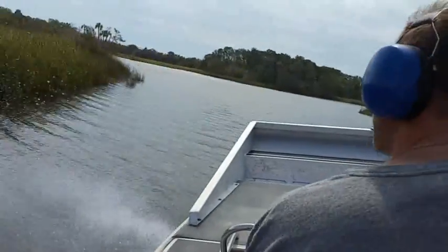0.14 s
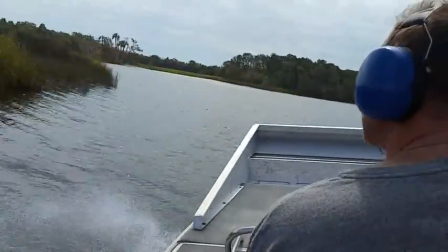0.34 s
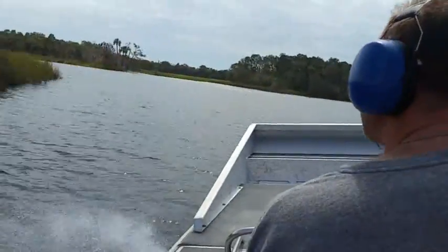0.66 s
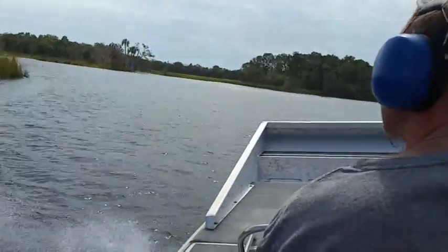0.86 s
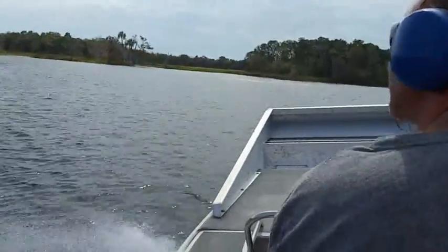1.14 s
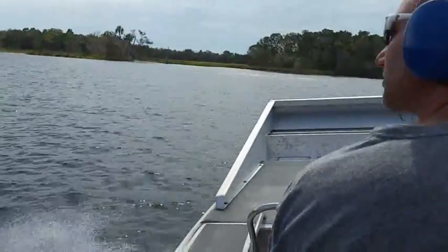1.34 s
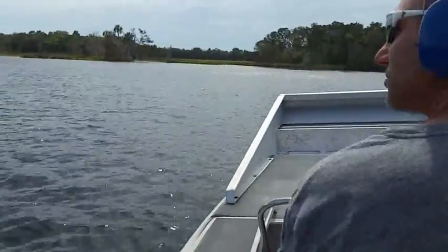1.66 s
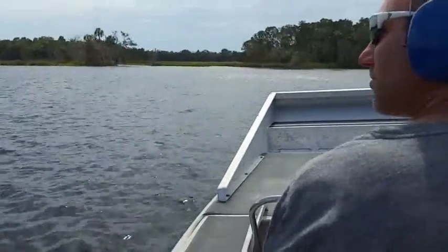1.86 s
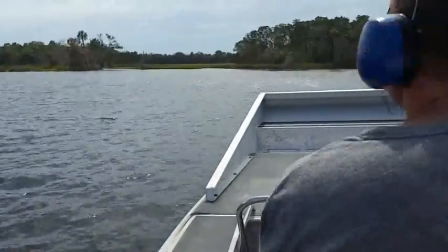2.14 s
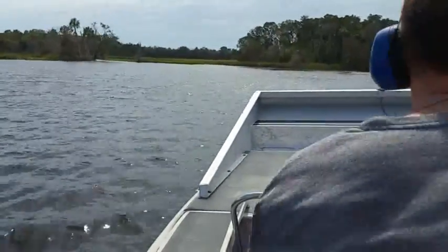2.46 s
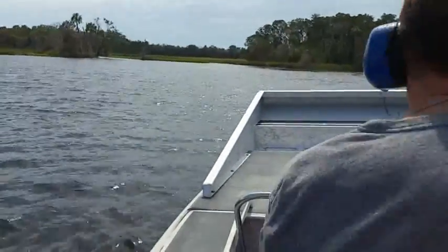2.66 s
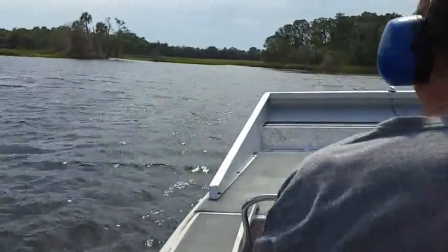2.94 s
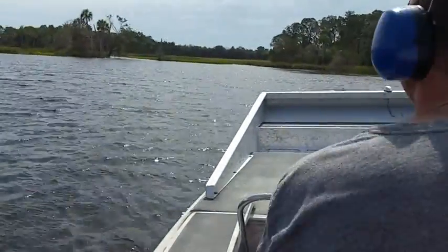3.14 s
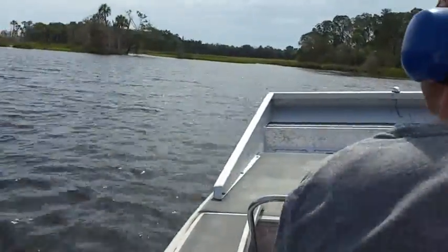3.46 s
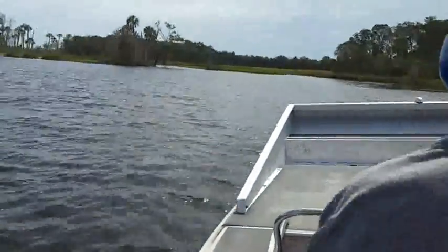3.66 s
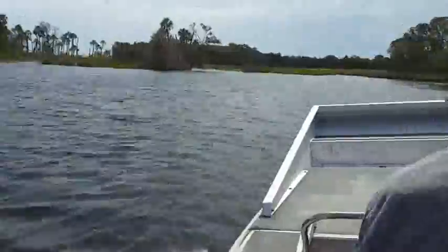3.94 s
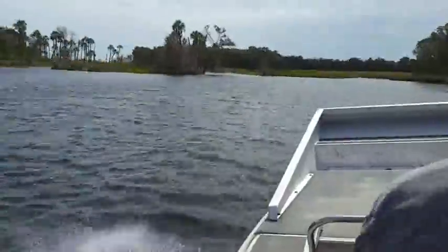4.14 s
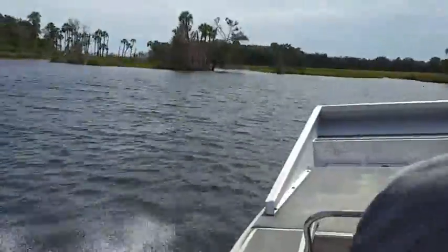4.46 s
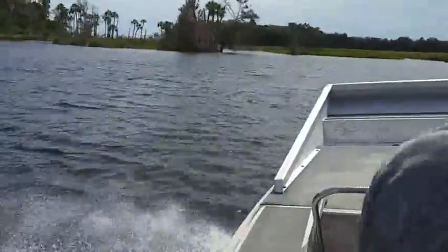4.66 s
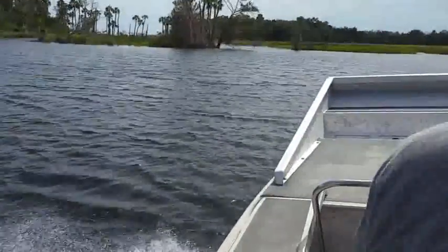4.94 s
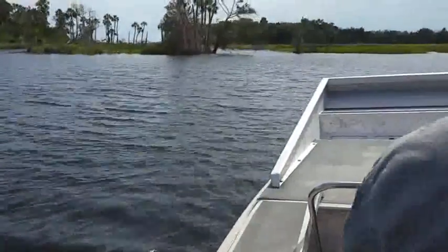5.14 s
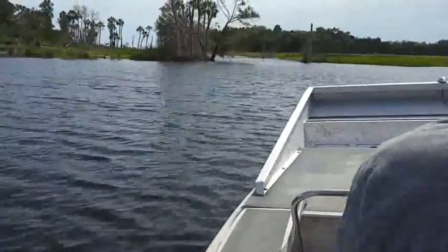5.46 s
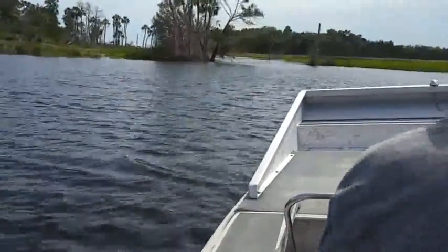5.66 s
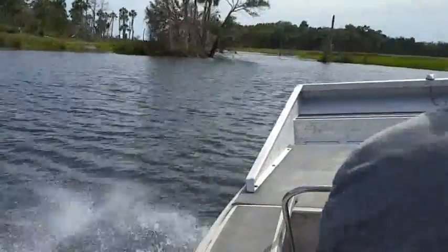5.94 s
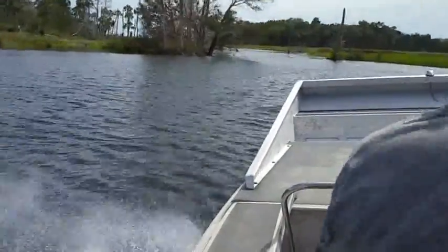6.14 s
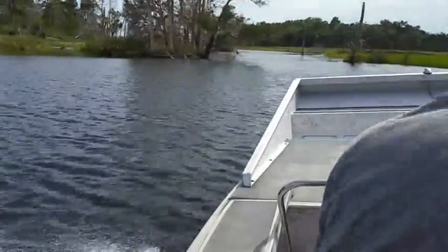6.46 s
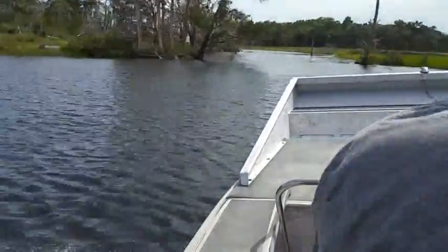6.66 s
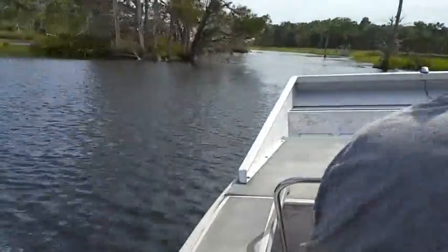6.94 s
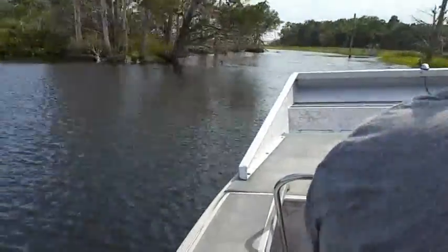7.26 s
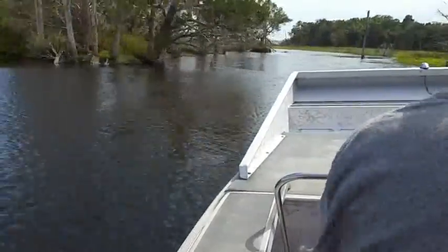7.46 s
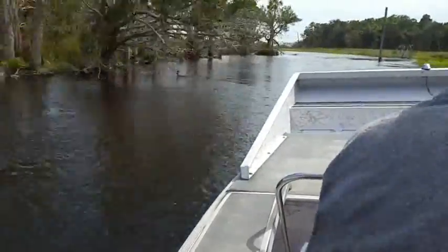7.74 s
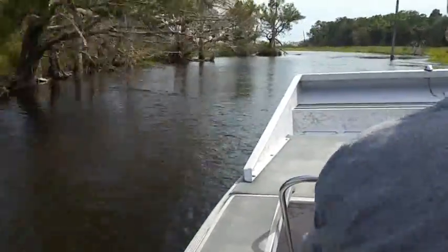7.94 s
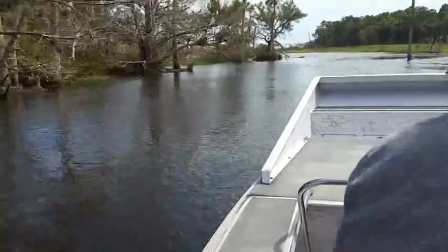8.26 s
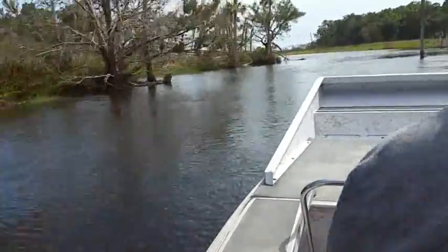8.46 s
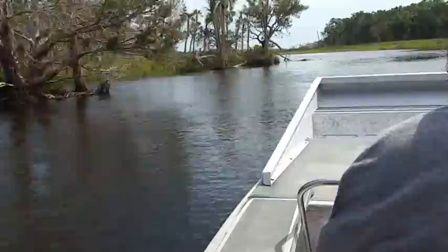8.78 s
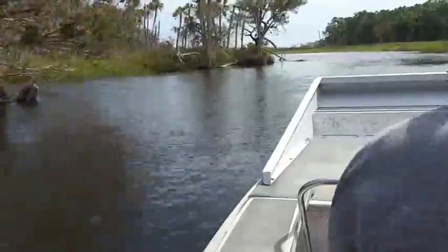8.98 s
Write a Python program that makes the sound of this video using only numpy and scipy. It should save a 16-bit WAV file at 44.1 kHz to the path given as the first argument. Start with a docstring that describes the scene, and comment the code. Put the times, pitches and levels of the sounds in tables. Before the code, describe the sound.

Outdoor ride on a fast airboat, heard close and exposed to wind. The low, buzzing exhaust tone and propeller hum continue throughout, wavering slightly in pitch and level. Ragged gusts batter the microphone ports, with sharp fizz leaning right and low buffeting beneath. A tiny near-silent gap interrupts the middle, heavy gusts follow, and the last few seconds are smoother, with engine and blade rush more evident.

```python
"""A loud engine drone and low thumps of wind come first: an airboat at speed, heard from a passenger seat.
Tones tied to one turning shaft make the exhaust drone and the propeller hum; noise makes the rush of
blades and spray. Separate noise at each of two microphone ports makes the headwind roar, fizz and buffet,
with gusts on top. The level dips briefly a few times, and once the sound drops out for a moment."""
import sys
import numpy as np
from scipy import signal
from scipy.fft import rfft, irfft, next_fast_len
from scipy.io import wavfile
from scipy.ndimage import uniform_filter1d, map_coordinates

SR = 44100
rng = np.random.default_rng(int(sys.argv[2]) if len(sys.argv) > 2 else 0)


def dump(signal):
    """Clip the signal to [-1, 1] and save it as 16-bit WAV at the path in sys.argv[1]."""
    limited = np.clip(np.atleast_2d(signal).T, -1, 1)
    pcm = np.round(limited * 32767).astype(np.int16)
    wavfile.write(sys.argv[1], SR, pcm)


N = 401751  # length in samples
BLADES_PER_FIRING = .5225  # propeller blade passes for each engine firing


def amp(db):
    """Turn decibels into a gain."""
    return 10 ** (np.asarray(db) / 20)


def power(db):
    """Turn decibels into a power, because powers of unrelated noises add."""
    return amp(db) ** 2


def to_db(p):
    """Turn a power into decibels."""
    return 10 * np.log10(p)


def unit(x):
    """Scale a sound to an rms of 1."""
    return x / np.sqrt(np.mean(x ** 2) + 1e-20)


def along(points, hz):
    """Read a curve of (frequency_hz, value) points, evenly spaced by pitch rather than by Hz."""
    point_hz, value = np.transpose(points)
    return np.interp(np.log(hz + 1), np.log(point_hz + 1), value)


def curves(rows):
    """Join the rows with straight lines: one value per sample for each column after the time."""
    time_s, *columns = np.transpose(rows)
    return [np.interp(np.arange(N) / SR, time_s, column) for column in columns]


def wobble(rate):
    """A smooth random curve through `rate` random points a second."""
    knots = rng.standard_normal(int(N * rate / SR) + 4)
    return map_coordinates(knots, [np.arange(N) * rate / SR])


def filtered(x, response):
    """Multiply the spectrum of x by a gain that depends on frequency."""
    size = next_fast_len(N + SR // 2)
    spectrum = rfft(x, size) * response(np.fft.rfftfreq(size, 1 / SR))
    return irfft(spectrum, size)[..., :N]


def sides(db):
    """Left and right gains for a left minus right difference in dB."""
    return amp(np.array([db, -db]) / 2)


def rush(spectrum, balance, patchy_db):
    """Unrelated noise at each port, rms 1 over both, with patches of random gain in time and frequency."""
    noise = signal.stft(rng.standard_normal((2, N)), nperseg=512)[2]
    patches = uniform_filter1d(rng.standard_normal(noise.shape), size=6, axis=1)
    patches = uniform_filter1d(patches, size=12, axis=2)
    pair = signal.istft(noise * amp(patchy_db * unit(patches)), nperseg=512)[1][:, :N]
    return unit(filtered(pair, lambda hz: amp(along(spectrum, hz)) * sides(along(balance, hz))))


def swells(rows):
    """One bump per (peak_s, length_s) row, with its top at 1."""
    rise_share = .45  # share of the length before the peak
    edge_db, shape = 7, 1.18  # loss of power at the ends of the length; 1 is a sharp top, 2 a round one
    from_peak_s = np.arange(N)[None] / SR - np.array(rows)[:, :1]
    span_s = np.array(rows)[:, 1:2] * np.where(from_peak_s < 0, rise_share, 1 - rise_share)
    distance = np.minimum(np.abs(from_peak_s / span_s), 9)
    return amp(-2 * edge_db * distance ** shape)


def shaft_tone(turn, multiple, rad):
    """A sine, rms 1, locked to a multiple of the firing phase; moving air makes its phase waver."""
    waver = rad * (wobble(9) + 0.64 * np.array([wobble(8), wobble(9)]))  # shared, plus each side's own
    return np.sqrt(2) * np.sin(multiple * turn + waver)


def geared_tones(turn):
    """Three tones geared to the shaft, so their pitches follow the firing rate."""
    # tones: multiple of the firing rate, left_minus_right [dB]
    gears = [(1.6, -5), (2.2, 5), (3.135, 0)]
    # their changing levels before the wobble: time_s, low_db, middle_db, high_db
    gear_levels = [(0, -33, -45.5, -30.5), (1, -38, -28.5, -33.5), (1.5, -35, -33, -28),
                   (2.7, -42, -38.5, -32.5), (3.85, -46, -34, -29), (4.5, -35, -35, -31.5),
                   (5.2, -35, -35.5, -44), (5.8, -46, -29, -33), (6.5, -36.5, -31.5, -33),
                   (7.7, -45, -29, -29.5), (9.11, -40, -43, -37)]
    sound = 0
    for (multiple, side_db), level_db in zip(gears, curves(gear_levels)):
        gain = amp(level_db + 0.91 * wobble(7)) * sides(side_db)[:, None]
        sound = sound + gain * shaft_tone(turn, multiple, rad=0.25)
    return sound


def propeller_hum(turn, drone_db):
    """Harmonics of the blade passes, which grow and shrink partly with the drone."""
    # hum: harmonic number of the blade passes, middle level_db, left_minus_right [dB]
    hum_harmonics = [(1, -40, -1), (4, -37, -3), (5, -38, 4.5), (7, -42, -2.5), (8, -41.5, -2.5),
                     (9, -36.5, -1.5), (10, -45.5, -3)]
    follow = 0.5  # dB of hum per dB of drone
    sound = 0
    for harmonic, level_db, side_db in hum_harmonics:
        moving_db = level_db + follow * (drone_db - drone_db.mean()) + 3.1 * wobble(3.5)
        tone = shaft_tone(turn, harmonic * BLADES_PER_FIRING, rad=0.41)
        sound = sound + amp(moving_db) * sides(side_db)[:, None] * tone
    return sound


def blade_rush(turn):
    """Steady noise of blades and spray, puffed by each blade and each firing."""
    # tone color of the rush: frequency_hz, relative level per Hz [dB]
    blade_spectrum = [(150, -25.5), (400, -2), (1100, -3.5), (1600, -6), (2150, -5), (2600, -9),
                      (2950, -11.5), (3200, -15), (4600, -25), (5400, -21), (6400, -24), (7300, -28.5),
                      (7600, -43.5)]
    # its balance at the seat: frequency_hz, left_minus_right [dB]
    seat_balance = [(400, 0.5), (1300, -1), (1900, -2.5), (2300, -11), (2950, -8.5), (3400, -3.5),
                    (5300, -3.5), (6500, -12), (7400, -6.5)]
    blade_puffs = 0.092 * shaft_tone(turn, BLADES_PER_FIRING, rad=0.81)
    firing_puffs = 0.049 * shaft_tone(turn, 1.0, rad=0.7)
    noise = rush(blade_spectrum, seat_balance, patchy_db=0.0)
    return amp(-21) * (1 + blade_puffs + firing_puffs) * noise


def engine():
    """The exhaust drone at the firing rate, and every other sound that follows the same shaft."""
    # engine speed and drone: time_s, firing rate [Hz], drone level_db before the wobble, left_minus_right [dB]
    shaft_course = [(0.0, 148, -13, 1), (0.09, 149, -14, 1), (0.12, 152.5, -18.5, 0), (0.45, 154, -22, 3),
                    (1.0, 151.7, -17.5, 0.5), (1.4, 149.3, -19.5, -3.5), (1.7, 148, -19, -1),
                    (2.24, 147, -23.5, 3), (2.68, 147.3, -19.5, 0), (2.87, 147.3, -26.5, 5),
                    (3.07, 147.3, -22, -3.5), (3.63, 147.8, -26, 4.5), (4.2, 149.2, -28.5, 7),
                    (4.8, 150.2, -23, 2.5), (5.45, 150.5, -27, 3), (5.85, 150.9, -21, 1.5),
                    (6.5, 149.9, -20.5, 1.5), (7.55, 147.9, -19, -1.5), (7.98, 147.3, -21.5, -4),
                    (8.2, 147.1, -20.5, -0.5), (9.11, 144.9, -20.5, 1.5)]
    firing_hz, drone_db, side_db = curves(shaft_course)
    turn = 2 * np.pi * np.cumsum(firing_hz) / SR  # phase of the firing, in radians
    drone = amp(drone_db + 1.7 * wobble(11)) * sides(side_db) * shaft_tone(turn, 1, rad=0.33)
    return drone + geared_tones(turn) + propeller_hum(turn, drone_db) + blade_rush(turn)


def wind_buffet():
    """Low, lumpy noise of the wind, with a few low blows at the start."""
    # tone color: frequency_hz, relative level per Hz [dB]
    thud_spectrum = [(12, -42.5), (25, -25), (50, -9), (75, -1), (130, 0.5), (260, -4.5), (500, -49)]
    # steady buffeting: time_s, level_db
    buffet_course = [(0, -25), (1, -24), (2.2, -25), (4.6, -25.5), (5.5, -26.5), (6.4, -25), (7.8, -24),
                     (9.11, -23.5)]
    # blows at the start: peak_s, length_s, level_db
    thumps = [(0.022, 0.039, -10.5), (.06, .03, -10.5), (.082, .04, -7)]
    blows = power(np.array(thumps)[:, 2]) @ swells(thumps)
    level_db = to_db(power(curves(buffet_course)[0]) + blows)
    lumps = amp(1.1 * np.array([wobble(7.9), wobble(9.5)]))
    noise = rush(thud_spectrum, [(30, 3.3), (250, 1.4)], patchy_db=2.1)
    return amp(level_db) * unit(lumps * noise)


def wind():
    """Gusts add to the headwind. Eddies flutter roar and fizz together at a port; hard gusts flutter fizz more."""
    # headwind between gusts, before the wobble: time_s, roar_db, fizz_db
    headwind = [(0, -21.5, -40), (.7, -19, -35), (1.3, -24.5, -39), (2, -16.5, -38.5), (2.55, -20, -38),
                (3.1, -18, -37.5), (3.45, -21, -37.5), (4, -15.5, -30), (4.3, -17, -29), (4.65, -18, -35.5),
                (5, -15.5, -29.5), (5.5, -17.5, -34.5), (5.82, -20.5, -36), (6.2, -19, -37.5),
                (6.9, -19, -41), (7.5, -22, -42), (8.3, -17.5, -36.5), (9.11, -21, -39.5)]
    # gusts: peak_s, length_s, roar_db, fizz_db, fizz left_minus_right [dB]
    gust_rows = [(0.073, 0.087, -16.5, -32.5, -8), (0.267, .07, -14, -30.5, -7),
                 (0.431, .08, -11, -28, -10.5), (0.838, 0.089, -13.5, -34, -4.5),
                 (1.28, .09, -13, -33.5, 2.5), (1.517, .07, -13.5, -35.5, -3.5),
                 (1.844, 0.066, -12.5, -37.5, -5), (2.032, 0.11, -21.5, -31.5, -9),
                 (2.23, .2, -17, -32, -5.5), (2.687, .08, -12.5, -32, -12.5), (2.76, .08, -18, -31, -7),
                 (2.86, 0.17, -14.5, -27.5, -7.5), (3.432, 0.072, -11, -26, -6.5),
                 (3.647, 0.085, -10.5, -23, -9.5), (3.803, .08, -10, -23.5, -8),
                 (4.11, 0.18, -16, -30.5, -10), (4.369, 0.093, -12, -28, -12),
                 (4.448, 0.12, -19.5, -30.5, -10.5), (4.556, .09, -11.5, -25, -10),
                 (4.692, .06, -11, -26.5, -16), (4.785, 0.12, -11, -24.5, -5), (5.05, .25, -21, -31, -8.5),
                 (5.26, 0.092, -13.5, -23.5, -4.5), (5.396, 0.17, -16, -24.5, -4),
                 (5.726, .08, -12, -31, -17.5), (5.898, .07, -12.5, -30.5, -17),
                 (6.008, .06, -12.5, -28, -11), (6.099, 0.089, -17, -28, -8),
                 (6.284, 0.11, -22.5, -30.5, -13.5), (6.49, .06, -14, -37, -6),
                 (6.56, .08, -13.5, -33, -8.5), (7.509, 0.065, -16.5, -35, -8),
                 (7.735, 0.062, -14, -36, -7), (7.948, .08, -14, -34.5, -2.5),
                 (8.182, .07, -15.5, -34, -8.5), (8.543, 0.092, -13, -28, -10)]
    # tone color of the roar: frequency_hz, relative level per Hz [dB]
    roar_spectrum = [(60, -38), (130, -7), (250, -1), (500, -1), (900, -4), (1500, -8.5), (2200, -10),
                     (2900, -19), (4200, -28.5), (7600, -47.5)]
    # balance of the roar: frequency_hz, left_minus_right [dB]
    port_balance = [(250, 1.5), (600, -2), (1500, -3), (2400, -6.5), (4000, -4.5)]
    # tone color of the fizz: frequency_hz, relative level per Hz [dB]
    fizz_spectrum = [(1500, -28.5), (3000, 8.5), (4000, 5.5), (5600, 1.5), (6600, -0.5), (7300, -9.5),
                     (7600, -23)]
    steady_lean_db = -6.5  # fizz left minus right between gusts
    eddy_db = 1.5  # small unsteadiness of the roar between gusts

    steady_roar_db, steady_fizz_db = curves(headwind)
    _, _, gust_roar_db, gust_fizz_db, gust_lean_db = np.transpose(gust_rows)
    gusts = swells(gust_rows)
    roar_db = to_db(power(steady_roar_db + eddy_db * wobble(12)) + power(gust_roar_db) @ gusts)
    fizz_db = []
    for port in (1, -1):  # left, right
        steady = power(steady_fizz_db + port * steady_lean_db / 2 + 2.5 * wobble(9))
        gusty = power(gust_fizz_db + port * gust_lean_db / 2) @ gusts
        fizz_db.append(to_db(steady + gusty))
    fizz_db = np.array(fizz_db)

    flutter_db = np.array([.7 * wobble(50) + 0.92 * wobble(110) + 1.5 * wobble(350) for port in range(2)])
    hardness = np.clip(0.5 + 0.088 * (roar_db - roar_db.mean()), .3, 3)
    lean_db = 0.31 * (fizz_db[0] - fizz_db[1])  # the port that fizzes more also roars more
    roar_noise = unit(amp(flutter_db) * rush(roar_spectrum, port_balance, patchy_db=1.0))
    roar = amp(roar_db) * sides(lean_db - lean_db.mean()) * roar_noise
    fizz_noise = rush(fizz_spectrum, [(3000, 2.0), (5500, -2.0), (7600, -3.5)], patchy_db=0.9)
    fizz = amp(fizz_db) * unit(amp(1.5 * hardness * flutter_db) * fizz_noise)
    return roar + fizz + wind_buffet()


def scene():
    """Engine and wind together; the whole level dips briefly a few times."""
    # dips: peak_s, length_s, depth_db
    dips = [(0.776, .04, 2), (4.285, 0.044, 2.5), (5.664, 0.044, 1.5), (7.455, 0.037, 4.5)]
    dip_db = np.array(dips)[:, 2] @ swells(dips)
    return (engine() + wind()) * amp(-dip_db)


def record(dry):
    """Soft clipping rounds the peaks, a dropout leaves a faint fading trace, and a filter cuts the top."""
    # dropout: start_s, end_s
    start_s, end_s = (3.4525, 3.5030)
    ceiling, top_hz = .94, 7580  # largest level after soft clipping; upper band limit
    clipped = dry / (1 + np.abs(dry / ceiling) ** 6) ** (1 / 6)
    t = np.arange(N) / SR
    since_s = t - start_s
    trace = amp(-21 - 500 * np.abs(since_s) - 1.6e5 * since_s ** 2)
    broken = clipped * np.where((t > start_s) & (t < end_s), trace, 1)
    return filtered(broken, lambda hz: 1 / (1 + (hz / top_hz) ** 200))


dry = scene()
out = record(dry)
dump(out)
```